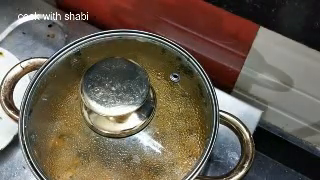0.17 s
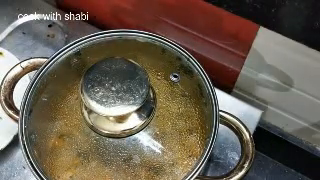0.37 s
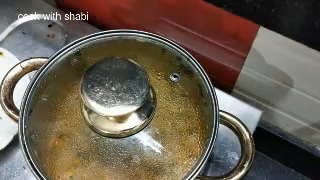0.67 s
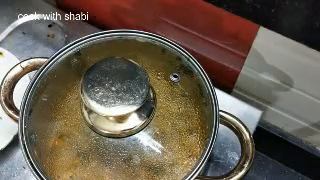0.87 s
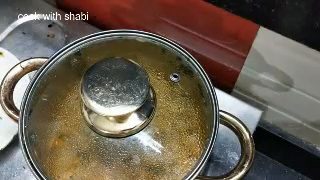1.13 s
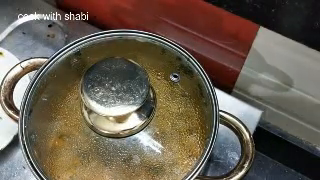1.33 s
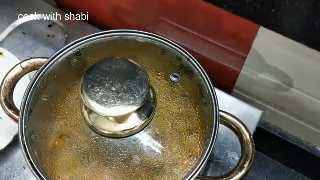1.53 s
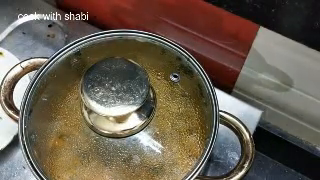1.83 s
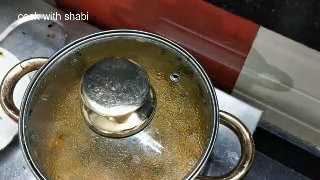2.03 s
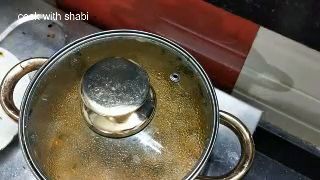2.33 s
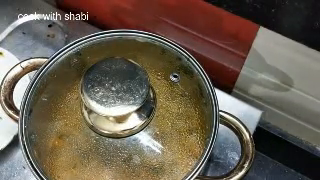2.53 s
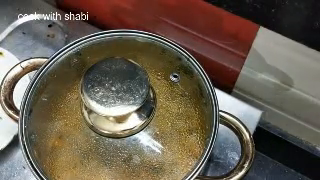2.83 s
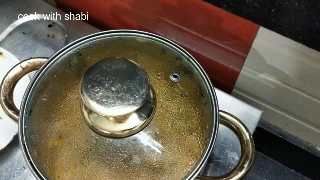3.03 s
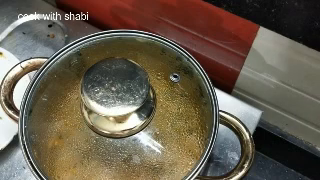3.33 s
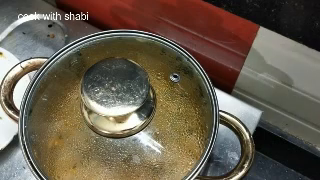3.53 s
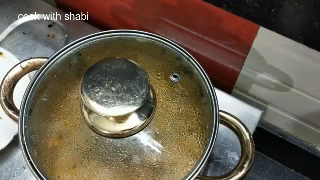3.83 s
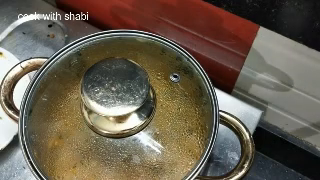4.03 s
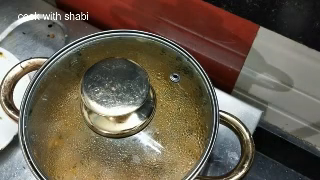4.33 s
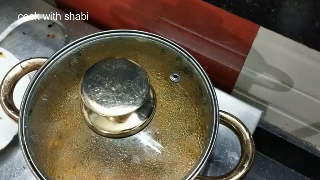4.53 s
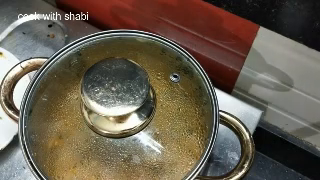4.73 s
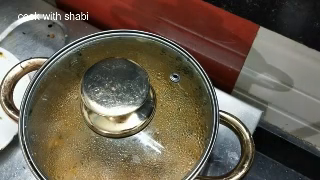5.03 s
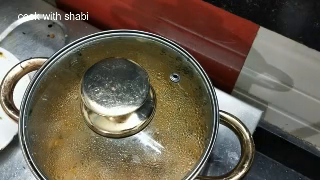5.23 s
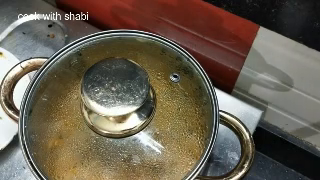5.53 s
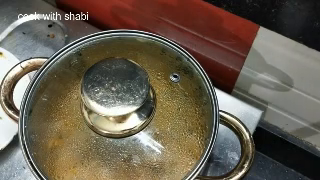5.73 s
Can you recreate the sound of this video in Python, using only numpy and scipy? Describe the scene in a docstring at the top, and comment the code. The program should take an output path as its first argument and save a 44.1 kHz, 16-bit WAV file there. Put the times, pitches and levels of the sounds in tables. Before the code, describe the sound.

A fine, bright sizzle from a simmering lidded pot runs throughout, easing slightly until about 2 s and then slowly growing, over a low house murmur and faint hum. Two crisp ticks come at 0.33 s, weaker ticks and a soft knock near 0.85 s. A double knock at 1.35 s sets something loose buzzing briefly; a light clack follows at 1.6 s. A strong, dull, hollow knock lands at 2.14 s, then smaller knocks and a clack until 2.75 s, including a brighter hollow one at 2.65 s. From 2.9 to 3.8 s only faint bumps and tiny wavering hinge squeaks on the right. Between 4.1 and 4.7 s heavy door thuds tumble together, booming, loudest at 4.2 s, with short room echo. Slight squeaks follow at 4.8 to 5.4 s. At 5.4 s a tap splashes on, hissing to the left and drumming on steel, with a bubble-like blip at 5.83 s.

```python
"""Throughout, a fine high sizzle: a pot of gravy simmers under its glass lid in a small hard kitchen.
Ticks, knocks, clacks, faint low bumps and door thuds ring as decaying modes with a diffuse room tail.
Hollow notes swell under thuds and some knocks, something loose rattles, wavering tones squeak to the right.
At the end a tap runs into a steel sink: noise as spray to the left, narrow bands as drumming.
The microphone is a phone's two ports, left and right; low house murmur and a hum lie behind it all."""
import sys
import numpy as np
from scipy import signal
from scipy.fft import rfft, irfft
from scipy.io import wavfile
from scipy.ndimage import uniform_filter1d

SR = 44100
rng = np.random.default_rng(int(sys.argv[2]) if len(sys.argv) > 2 else 0)


def unload_audio(sound):
    """Save the sound as a 16-bit wav file, at the path given as the first command line argument."""
    columns = np.transpose(np.atleast_2d(sound))
    # keep every value between -1 and 1, then stretch to whole-number steps
    steps = np.round(np.clip(columns, -1, 1) * 32767)
    wavfile.write(sys.argv[1], SR, steps.astype(np.int16))


N = 259872

# The sizzle's level over time: (time [s], level [dB])
SIZZLE_LEVEL = [(0.0, -49.5), (2.21, -51), (5.89, -43.5)]
# The sizzle's spectrum, relative: (frequency [Hz], density [dB per Hz])
SIZZLE_SPECTRUM = [(5100, -19), (5900, -5.5), (6400, -3.5), (8500, -11), (10300, -5), (11200, -8.5),
                   (12600, -1.5), (14300, -0.5), (17000, -7)]
# Where the sizzle lies between the ports: (frequency [Hz], left minus right [dB])
SIZZLE_PAN = [(4400, 17), (8120, -0.5), (15000, 5)]

# Edges of the seven bands in which blows and room are described: (frequency [Hz], ...)
BAND_EDGES_HZ = (80, 140, 250, 500, 1100, 1780, 4200, 6900)
# Blows of each thing: (time [s], strength [dB], lift of the upper bands [dB],
# hardness: tilt of the upper bands [dB per octave to the power of the bend])
TICKS = [(0.329, -31.5, 5, -3.5), (0.354, -30.5, 9.5, 3), (0.845, -41, -7.5, 11), (0.864, -37, -17, 9.5)]
KNOCKS = [(0.871, -44, 3, 3), (1.331, -32, -17.5, 9), (1.364, -26, -0.5, 4), (1.962, -49, -40, -3),
          (2.131, -47, -4, -19), (2.141, -18.5, -2, -13.5), (2.234, -35.5, 6, -28), (2.246, -38.5, 4, -25),
          (2.402, -29, 10.5, 1.5), (2.456, -34.5, 7, -3), (2.625, -50.5, 10.5, 1.5), (2.64, -40, 1, -15),
          (2.651, -23, 7.5, -0.5), (2.737, -29, -2, -1)]
THUDS = [(4.094, -20.5, -7.5, -2), (4.196, -14.5, 1, 2), (4.201, -8, 1, 1.5), (4.326, -18, 0, 1.5),
         (4.343, -14, -2, 0.5), (4.386, -9.5, -13, -13), (4.446, -9.5, 1.5, 2), (4.59, -10.5, 1.5, 0),
         (4.648, -16.5, -0.5, -2.5), (4.7, -23, -2.5, -3.5)]
SPLASHES = [(5.422, -50, -14, 1), (5.436, -23, -0.5, -1.5), (5.638, -44.5, 16, -15.5),
            (5.83, -58.5, 24.5, 3)]
BUMPS = [(0.677, -44, -34, -2), (0.961, -42, -29, 1), (2.048, -57, 6.5, 0), (3.045, -58, 4.5, -2),
         (3.091, -56, 5.5, 4.5), (3.178, -55, 5.5, -5.5), (3.639, -43.5, -28, 15.5), (3.69, -58.5, 8, -5),
         (4.959, -64.5, 3.5, -30.5), (5.118, -62, 4, 1)]
CLACKS = [(1.6, -34, 2.2, 2.5), (2.332, -35.5, 9.9, -1.5)]
# What each struck thing rings with: (frequency [Hz], relative level [dB], t60 [s])
TICK_MODES = [(638, -12.5, 0.29), (705, -1.5, 0.13), (778, -2, 0.19), (1400, -11, 0.23),
              (2500, -20.5, 0.061), (5020, -7, 0.078), (5580, 10, 0.014)]
BOARD_MODES = [(182, 1, 0.32), (302.2, -2.5, 0.25), (335, 2.5, 0.26), (393.2, -2.5, 0.3), (670, -12, 0.28),
               (802.7, -5, 0.22), (903, -2, 0.15), (1093.7, -14.5, 0.38), (1257, 1.5, 0.15),
               (1470, -5, 0.16), (1570, -7, 0.19), (2206, -1, 0.23), (2660, -4.5, 0.14), (2970, -3, 0.2)]
DOOR_MODES = [(106.7, 6.5, 0.61), (182.4, 4.5, 0.3), (258, -8.5, 0.38), (282.9, 2, 0.16), (334.4, -4, 0.38),
              (437, -14, 0.22), (544, -16, 0.15), (605.6, -5, 0.21), (668, -9, 0.38), (780.3, -7, 0.28),
              (1310, -27, 0.16), (1882, -8.5, 0.26), (2300, -13.5, 0.36)]
SINK_MODES = [(850, 21, 0.14), (1210, -17, 0.15), (1438, -6.5, 0.31), (1837, -5, 0.26), (2146, 0.5, 0.34),
              (2255, 2, 0.22), (2540, 0.5, 0.18), (2800, -6, 0.41)]
BUMP_MODES = [(102.8, 2, 0.35), (178.4, 5, 0.12), (250.3, -2.5, 0.22)]
CLACK_MODES = [(322, 5, 0.14), (372.4, -1, 0.29), (816, -9.5, 0.34), (882, 7.5, 0.075), (1366, -9, 0.17),
               (1930, -3, 0.22), (2220, 3, 0.074), (3070, -4.5, 0.13), (3710, -7.5, .2)]
# The next five tables run in the order: ticks, knocks, thuds, splashes, bumps, clacks.
# How each lands: (modes [dB], build-up of a mode [cycles], crack [dB], tail [dB], build-up of the tail [s])
LANDINGS = [(-3, 0.66, -1, -5, 0.0051), (-3.5, 0.54, -4, -1.5, 0.0057), (-7.5, 6.1, -5.5, -1.5, 0.034),
            (-13.5, 1.7, -4, -1, 0.015), (-1.5, 0.61, -15, -6, 0.0075), (-2, 1.5, -6, -6, 0.01)]
# Usual share of each of the seven bands: (share [dB], ...)
COLOURS = [(-52, -46, -49, -1.5, -7, -7, -10), (-64, -18, -4, -6, -12.5, -28, -69),
           (-14, -6, -0.5, -6, -14, -15.5, -32), (-57, -59, -48, -27, -1, -4.5, -8.5),
           (-3.5, 9, -2, -6, -46, -27, -60), (-44, -13, -7.5, -8.5, -9, -17, -26)]
# Where the upper bands of each thing begin: (frequency [Hz], ...)
UPPER_FROM_HZ = (1100, 500, 250, 1780, 140, 500)
# Place of each thing between the ports: (left minus right [dB], ...)
PLACES_DB = (3.8, 0.21, 0.79, 2.3, 0.27, .4)
# How the tilt bends towards the highest bands, above 1 steeper, below 1 gentler: (exponent on octaves [-], ...)
BENDS = (0.87, 1.73, 1.33, 0.91, 0.87, 1.2)
# The kitchen in each band: (reverberation t60 [s], diffuse tail [dB], likeness of the two ports [0-1])
KITCHEN = [(0.47, -11.5, 0.91), (0.54, -12, 0.8), (0.33, -9, 0.6), (0.34, -8.5, 0.07), (0.32, -7.5, 0),
           (0.33, -6, 0), (0.48, -6, 0)]
# Band of the very short snap: (lower edge [Hz], upper edge [Hz])
SNAP_BAND_HZ = (6900, 15500)

# Hollow notes that swell under door thuds and some knocks:
# (time [s], frequency [Hz], peak level [dB], time to the peak [s])
BOOMS = [(4.097, 255.3, -31, 0.053), (2.139, 311, -24.5, 0.016), (2.232, 311, -34, 0.016),
         (2.65, 895, -25.5, 0.014), (4.206, 181.8, -14.5, 0.032), (4.2, 794, -20, 0.009),
         (4.203, 301, -18.5, 0.0074), (4.338, 800, -30, 0.014), (4.36, 181.5, -21.5, 0.025),
         (4.45, 181.8, -15.5, 0.0495), (4.489, 331, -25.5, 0.02), (4.59, 261, -18.5, 0.014),
         (4.619, 199.6, -22.5, 0.028)]
# Onsets of the loose buzz: (time [s], level [dB], t60 [s])
RATTLES = [(1.329, -52, 0.47), (1.36, -34, 0.3)]
# Resonances of the loose thing: (frequency [Hz], width [Hz], relative level [dB])
RATTLE_PEAKS = [(2710, 100, 3), (3080, 850, 1), (5040, 330, -4)]
# Squeaks, hinge tones and last a short high squeak just before the tap:
# (time [s], length before the fade [s], mean pitch [Hz], level before trembling [dB],
# octave against the fundamental before it wavers [dB])
SQUEAKS = [(0.814, 0.026, 2050, -58, -24), (2.946, 0.046, 936, -66.5, -7), (3.018, 0.011, 1480, -65, -27),
           (3.043, 0.006, 1010, -64, -25), (3.084, 0.0068, 960, -51.5, -21.5),
           (3.266, 0.063, 1810, -61, -26), (3.328, 0.068, 1400, -69, -13), (3.339, 0.03, 942, -70, -17),
           (3.581, 0.12, 923, -60.5, -1), (3.776, 0.008, 926, -62, -20), (4.786, 0.096, 928, -51.5, -6),
           (4.982, 0.023, 940, -66, -21), (5.195, 0.016, 1136, -62, -15), (5.364, 0.057, 2860, -63.5, -21)]
# The running tap: (time [s], spray before flicker and panning [dB], drumming on the sink [dB])
TAP = [(5.4, -64, -54), (5.413, -43, -78), (5.441, -44.5, -37.5), (5.55, -47.5, -40.5), (5.65, -44.5, -43),
       (5.75, -43.5, -44.5), (5.8, -44.5, -63), (5.89, -44, -59)]
# One trapped bubble: (time [s], first pitch [Hz], last pitch [Hz], length [s], peak level [dB])
BUBBLE = (5.83, 2280, 1990, .055, -46)
# Spectrum of the murmur, relative: (frequency [Hz], density before flicker [dB per Hz])
MURMUR_SPECTRUM = [(20, 2), (35, 6), (60, 10.5), (98, -8.5), (180, 4.5), (295, -9.5), (526, -3), (650, -10),
                   (2500, -9), (3300, -10.5), (4300, -66), (6000, -33)]

SNAP_DB = -14  # against the top band's share
BOOM_SHARPNESS, BOOM_CHOKE = 0.45, 2.6  # exponents of the late swell
BOOM_LEAD_CYCLES = 0.045  # lead of the left port
RATTLE_RISE_S = 0.0069
SPRAY_HZ, SPRAY_WIDTH_HZ = 4850, 2130
MURMUR_DB, HUM_HZ, HUM_DB = -61, 105.6, -70  # hum level is before it wavers
PORT_DIP_HZ, PORT_DIP_WIDTH_HZ, PORT_DIP_SHARE = 3960, 1870, 0.59
TOP_HZ = 15720


def simmer():
    """Countless tiny bubbles under the lid merge to a high sizzle that eases slightly, then slowly grows."""
    s, db = np.transpose(SIZZLE_LEVEL)
    colour_hz, colour_db = np.transpose(SIZZLE_SPECTRUM)
    flat = [(colour_hz[0], 0), (colour_hz[-1], 0)]
    sizzle = coloured(flat, lambda hz: 0.05, flicker_db=1.1, rate=14)
    pan_hz, pan_db = np.transpose(SIZZLE_PAN)
    pitch = np.log(np.fft.rfftfreq(N, 1 / SR) + 1)
    sides = pan(np.interp(pitch, np.log(pan_hz), pan_db))
    colour = undb(np.interp(pitch, np.log(colour_hz), colour_db))
    sizzle = irfft(rfft(sizzle) * sides * colour, N)
    return level(sizzle, 0) * undb(np.interp(np.arange(N) / SR, s, db))


def spread(events, colour_db, upper_hz, pan_db, bend):
    """Share each blow over the bands: the thing's colour, lifted and tilted above by where and how hard it is hit."""
    octaves = np.log2(np.array(BAND_EDGES_HZ[:-1]) / upper_hz)
    hits = []
    for start, db, upper_db, tilt_db in events:
        lift_db = (octaves >= 0) * (upper_db + tilt_db * abs(octaves) ** bend)
        hits.append((start, db, *(np.array(colour_db) + lift_db), pan_db))
    return hits


def struck(events, modes, landing, scatter_db=2.5, apart_hz=650, detune=0.008, loose=0.6):
    """Each blow rings the modes by their band's share; size, phase and tuning vary from blow to blow."""
    ring_db, cycles, *_ = landing
    out, age = np.zeros((2, N)), np.arange(SR // 2) / SR
    for hz, db, t60 in modes:
        spin = np.exp(2j * np.pi * hz * age - np.log(1000) * age / t60)
        swell = ((1 - np.exp(-age * hz / cycles)) * spin)[:int(min(t60, 1) * SR)]
        mode_band = np.searchsorted(BAND_EDGES_HZ, hz) - 1
        chances = rng.standard_normal((len(events), 4))
        for (start, blow_db, *share_db, pan_db), (phase, skew, scatter, off) in zip(events, chances):
            drift = np.exp(2j * np.pi * hz * detune * off * age[:len(swell)])
            size = undb(blow_db + share_db[mode_band] + db + ring_db + scatter_db * scatter)
            # the higher the mode, the more its phase differs between the ports, up to a limit
            turn = loose * phase + min(hz / apart_hz, 2) * skew * np.array([0.5, -0.5])
            ports = size * pan(pan_db) * np.exp(1j * turn)
            add(out, start, np.outer(ports, swell * drift).imag)
    return out


def echoes(kinds, crack_s=0.003, lumps_db=2.2, lumps_per_s=75):
    """A short crack, then the walls fill in a lumpy diffuse tail that dies band by band."""
    out, age = 0, np.arange(SR) / SR
    crack = age / crack_s * np.exp(1 - age / crack_s)
    for k, (t60, band_db, like) in enumerate(KITCHEN):
        power = np.zeros((2, N))
        for events, _, (_, _, crack_db, tail_db, build_s) in kinds:
            tail = (1 - np.exp(-age / build_s)) ** 2 * np.exp(-2 * np.log(1000) * age / t60)
            shape = undb(tail_db) ** 2 * tail + undb(crack_db) ** 2 * crack
            shape = shape[:int(min(t60, 1) * SR)]
            for start, blow_db, *share_db, pan_db in events:
                gain = undb(blow_db + share_db[k] + band_db) * pan(pan_db)
                add(power, start, np.outer(gain ** 2, shape))
        lo, hi = BAND_EDGES_HZ[k], BAND_EDGES_HZ[k + 1]
        noise = np.sqrt(power) * undb(lumps_db * walk(lumps_per_s)) * pair(like)
        # make up for the power lost by cutting the noise to one band
        out = out + np.sqrt(SR / 4 / (hi - lo)) * band(noise, lo, hi, order=3)
    return out


def snaps(events, snap_s=0.0035):
    """A very short burst of noise in the top octave, as strong as each blow's highest band asks."""
    power, age = np.zeros((2, N)), np.arange(SR // 20) / SR
    shape = age / snap_s * np.exp(1 - age / snap_s)
    for start, blow_db, *share_db, pan_db in events:
        gain = undb(blow_db + share_db[-1] + SNAP_DB) * pan(pan_db)
        add(power, start, np.outer(gain ** 2, shape))
    return band(np.sqrt(power) * pair(0.1), *SNAP_BAND_HZ)


def blows():
    """All struck things: ringing modes, crack and room tail, with snaps on ticks, thuds and splashes."""
    events = (TICKS, KNOCKS, THUDS, SPLASHES, BUMPS, CLACKS)
    modes = (TICK_MODES, BOARD_MODES, DOOR_MODES, SINK_MODES, BUMP_MODES, CLACK_MODES)
    hits = list(map(spread, events, COLOURS, UPPER_FROM_HZ, PLACES_DB, BENDS))
    kinds = list(zip(hits, modes, LANDINGS))
    ticks, _, thuds, splashes, *_ = hits
    ringing = sum(struck(*kind) for kind in kinds)
    return ringing + echoes(kinds) + snaps(ticks + thuds + splashes)


def booms():
    """Hollow notes under door thuds and some knocks: sines that swell late and are soon choked."""
    out, age = np.zeros((2, N)), np.arange(SR // 4) / SR
    lead = BOOM_LEAD_CYCLES * np.array([[0.5], [-0.5]])
    for (start, hz, db, peak_s), turn in zip(BOOMS, rng.random((len(BOOMS), 1))):
        late = (age / peak_s) ** BOOM_CHOKE
        swell = (late * np.exp(1 - late)) ** BOOM_SHARPNESS
        add(out, start, undb(db) * swell * np.sin(2 * np.pi * (hz * age + turn + lead)))
    return out


def rattle():
    """Something loose buzzes around a knock and on after it: dense uneven clicks in a few high resonances."""
    power, age = np.zeros((2, N)), np.arange(SR // 2) / SR
    for start, db, t60 in RATTLES:
        swell = undb(db - 60 * age / t60) * np.clip(age / RATTLE_RISE_S, 0, 1)
        add(power, start, np.ones((2, 1)) * swell ** 2)
    clicks = pair(0.3) * undb(3.5 * rng.exponential(size=N))
    buzz = sum(undb(db) * band(clicks, hz - width / 2, hz + width / 2) for hz, width, db in RATTLE_PEAKS)
    return np.sqrt(power) * level(buzz, 0)


def squeaks():
    """Squeaks: a rough wavering tone with its octave, trembling in level, with a short fade."""
    out, age = np.zeros((2, N)), np.arange(SR // 2) / SR
    waver = 1 + 0.005 * walk(30) + 0.025 * walk(250)
    tremble = undb(6.5 * np.minimum(walk(50), 0.4))
    broken = undb(5 * np.minimum(walk(35), 0.5))  # the octave comes and goes on its own
    for start, length, hz, db, octave_db in SQUEAKS:
        first = int(start * SR)
        swell = np.clip(age / 0.01, 0, 1) * np.exp(-np.clip(age - length, 0, 1) / 0.019)
        phase = 2 * np.pi * np.cumsum(hz * waver[first:][:len(age)]) / SR
        octave = undb(octave_db) * broken[first:][:len(age)] * np.sin(2 * phase)
        add(out, start, np.outer(pan(-14.0), undb(db) * swell * (np.sin(phase) + octave)))
    return out * tremble


def tap():
    """Dense droplets hiss as spray and keep the sink's modes trembling; a trapped bubble rasps and sinks in pitch."""
    s, spray_db, drum_db = np.transpose(TAP)
    first = int(s[0] * SR)
    t = np.arange(first, N) / SR
    drops = rng.standard_normal((2, SR)) * undb(1.8 * rng.exponential(size=(2, SR)))
    drops = drops[:, :len(t)]
    spray = band(drops, SPRAY_HZ - SPRAY_WIDTH_HZ / 2, SPRAY_HZ + SPRAY_WIDTH_HZ / 2, order=3)
    spray = level(spray, 0) * undb(2.2 * walk(30)[first:])
    spray = spray * undb(np.interp(t, s, spray_db)) * pan(10.7)[:, None]
    # the water damps the steel, so its modes smear into narrow bands; the longer one rings, the more it builds up
    drum = 0
    for hz, db, t60 in SINK_MODES:
        if hz > 1300:
            trembling = undb(db + 3.5 * walk(35)[first:])
            drum = drum + trembling * band(drops, 0.985 * hz, 1.015 * hz) * t60 ** 2
    drum = level(drum, 0) * undb(np.interp(t, s, drum_db))
    out = np.zeros((2, N))
    add(out, s[0], spray + drum)
    start, from_hz, to_hz, length, db = BUBBLE
    age = np.arange(int(length * SR)) / SR
    phase = 2 * np.pi * np.cumsum(from_hz + (to_hz - from_hz) * age / length) / SR
    rasp = np.sin(phase + 1.5 * walk(300)[:len(age)])
    add(out, start, undb(db) * np.sin(np.pi * age / length) * rasp * np.ones((2, 1)))
    return out


def air():
    """Burner rumble and the murmur of the house, with a wavering hum; the bass is most alike at both ports."""
    murmur = coloured(MURMUR_SPECTRUM, lambda hz: 1 - hz / 450 - 6 / hz, flicker_db=2.0, rate=4.765)
    hum = level(band(rng.standard_normal(N), HUM_HZ - 5, HUM_HZ + 5), HUM_DB)
    return level(murmur, MURMUR_DB) + hum * undb(3.5 * walk(5))


def coloured(table, like, flicker_db, rate):
    """Third-octave noise bands that follow a spectrum, each flickering on its own."""
    hz, db = np.transpose(table)
    out = 0
    for f in hz[0] * 2 ** np.arange(0, np.log2(hz[-1] / hz[0]), 1 / 3):
        gain_db = np.interp(np.log(f), np.log(hz), db) + flicker_db * walk(rate)
        out = out + undb(gain_db) * band(pair(like(f)), f / 2 ** (1 / 6), f * 2 ** (1 / 6))
    return out


def pair(like):
    """Noise of power 2 at both ports, alike by the given correlation."""
    like = np.clip(like, 0, 1)
    mid, side = rng.standard_normal((2, N))
    return np.sqrt(1 + like) * mid + np.sqrt(1 - like) * side * np.array([[1], [-1]])


def walk(rate):
    """Random levels held 1 / rate s and slewed twice; spread near 1."""
    k = int(SR / rate)
    held = rng.standard_normal(size=4000)[np.arange(N) // k]
    return 1.3 * uniform_filter1d(uniform_filter1d(held, k), k)


def band(x, lo_hz, hi_hz, order=2):
    """Band-pass."""
    return signal.sosfilt(signal.butter(order, [lo_hz, hi_hz], "bandpass", fs=SR, output="sos"), x)


def undb(db):
    """Decibels to gain."""
    return 10 ** (np.asarray(db) / 20)


def level(x, db):
    """Scale to an rms level."""
    return x * undb(db) / np.sqrt(np.mean(x ** 2))


def pan(db):
    """Gains of the two ports for a left-minus-right difference."""
    return undb(np.array([db, -db]) / 2)


def add(out, start, sound):
    """Mix a sound in at a time in s."""
    i = int(start * SR)
    out[:, i:i + sound.shape[1]] += sound[:, :N - i]


def scene():
    """All sources at the two ports."""
    return simmer() + blows() + booms() + rattle() + squeaks() + tap() + air()


def record(dry):
    """The microphone ports have a dip in the low treble; the phone cuts the top steeply."""
    dip = band(dry, PORT_DIP_HZ - PORT_DIP_WIDTH_HZ / 2, PORT_DIP_HZ + PORT_DIP_WIDTH_HZ / 2, order=1)
    heard = dry - PORT_DIP_SHARE * dip
    return signal.sosfilt(signal.ellip(12, 0.5, 60, TOP_HZ, fs=SR, output="sos"), heard)


dry = scene()
out = record(dry)
unload_audio(out)
```